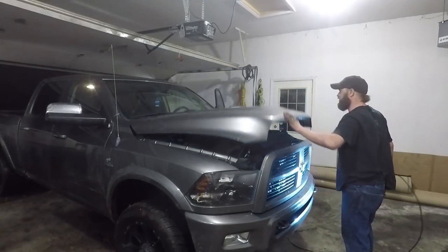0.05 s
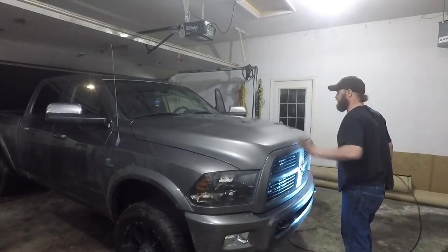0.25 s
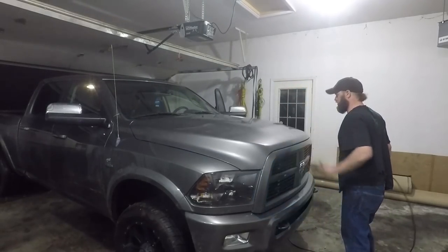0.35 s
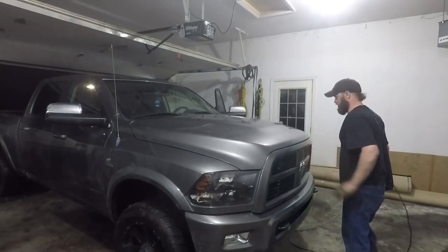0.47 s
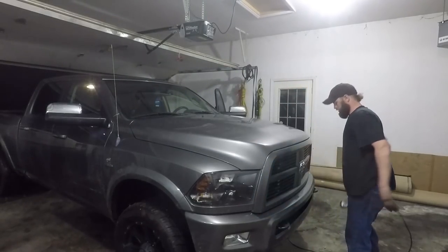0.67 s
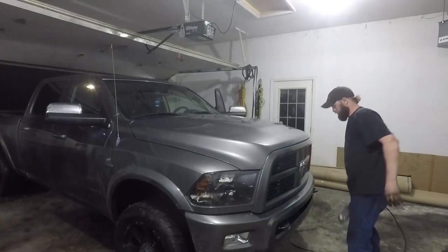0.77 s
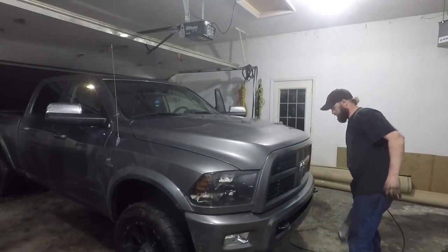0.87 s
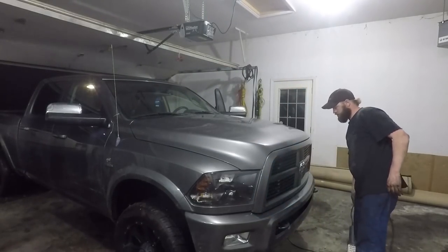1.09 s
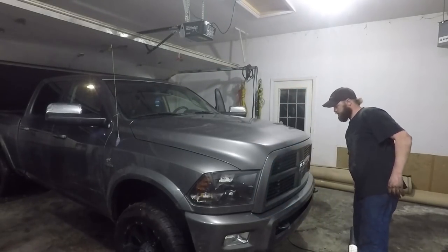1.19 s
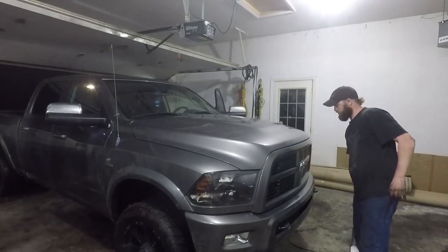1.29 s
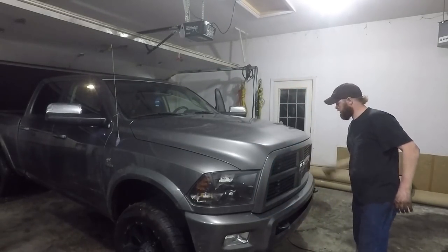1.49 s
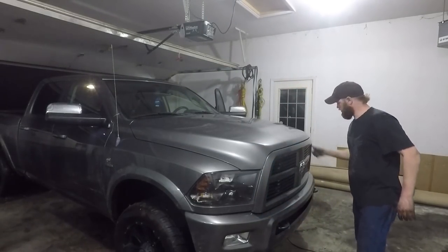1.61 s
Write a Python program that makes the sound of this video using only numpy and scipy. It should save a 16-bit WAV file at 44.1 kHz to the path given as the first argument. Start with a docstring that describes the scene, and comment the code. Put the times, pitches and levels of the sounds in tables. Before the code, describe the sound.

Truck hood slammed closed in a garage: sharp latch crack, deep boom, rattle, then faint knocks.

```python
"""Hood slam in a garage

A pickup's steel hood is slammed a few metres from a small camera: swelling panel modes, noise-burst
landings and chattering clicks. The latch cracks and rings; a lighter clank follows as the boom dies.
Later come soft scuffs, taps and a dull knock, over room tone, rumble and a faint whine.
Each hit is coloured noise plus garage reverberation; the camera's limiter holds the bang down."""
import sys
import numpy as np
from scipy import signal
from scipy.fft import rfft, irfft, next_fast_len
from scipy.io import wavfile
from scipy.ndimage import uniform_filter1d, minimum_filter1d

SR = 44100
rng = np.random.default_rng(int(sys.argv[2]) if len(sys.argv) > 2 else 0)


def file_out(sig):
    """Save sig as 16-bit WAV at sys.argv[1]."""
    # one column per channel
    cols = np.atleast_2d(sig).T
    # limit, then scale
    lim = np.clip(cols, -1, 1)
    pcm = np.round(lim * 32767).astype(np.int16)
    wavfile.write(sys.argv[1], SR, pcm)


N = 72765
SIZE = next_fast_len(N + N % 2, real=True)
T, HZ = np.arange(N) / SR, np.fft.rfftfreq(SIZE, 1 / SR)

# The two microphone ports. Each row: frequency in Hz, left minus right level in dB,
# likeness of the two from 0 to 1, left's phase lead in rad.
PORTS = [(40, 1, 0.45, -1.6), (100, 7, 0.77, 1), (199, 8, 0.94, -0.39), (370, 10.5, 0.99, -1.05),
         (717, 0.5, 0.89, -1.92), (1290, -6.5, 0.18, -1.91), (2140, -1, 0.26, -0.57),
         (3380, -2, 0.7, 0.037), (4870, 0, 0.3, -0.14), (6300, 6.5, 1, -1.8), (8600, -3, 0.56, -1.74),
         (14000, 0.5, 0, -0.51)]


def amp(db):
    """Decibels to gain."""
    return 10 ** (np.asarray(db) / 20)


def read(points, hz, axis=1):
    """One column of a table, interpolated on a log-frequency axis."""
    table = np.transpose(points)
    return np.interp(np.log(hz + 1), np.log(table[0] + 1), table[axis])


def add(mix, start_s, sound):
    """Mixes a sound in at a time, cut at the end of the mix."""
    part = mix[:, round(start_s * SR):][:, :sound.shape[1]]
    part += sound[:, :part.shape[1]]


def white():
    """Two independent white noises of 0 dB per Hz."""
    return rng.standard_normal((2, SIZE)) * np.sqrt(SR / 2)


def decay(t60_s, rise_s):
    """Exponential fall of 60 dB per t60, with an exponential rise."""
    rise = 1 - np.exp(-T / rise_s)
    return rise * np.exp(-np.log(1000) * T / t60_s)


def ports(hz):
    """Complex gain of the left and right port at a frequency, at constant summed power."""
    ratio = amp(read(PORTS, hz))
    right = np.exp(-1j * read(PORTS, hz, axis=3))
    return np.array([ratio + 0j, right]) * np.sqrt(2 / (1 + ratio ** 2))


def heard(drive, colour):
    """Colours a noise pair with a minimum-phase filter, correlates it and passes it to the ports."""
    log_gain = np.log(amp(read(colour, HZ)))
    # Folding the cepstrum makes the filter causal.
    cepstrum = irfft(log_gain, SIZE)
    cepstrum[1:SIZE // 2] *= 2
    cepstrum[SIZE // 2 + 1:] = 0
    colour_filter = np.exp(rfft(cepstrum))
    a, b = rfft(drive, SIZE)
    likeness = np.clip(read(PORTS, HZ, axis=2), 0, 1)
    pair = np.array([a, likeness * a + np.sqrt(1 - likeness ** 2) * b])
    return irfft(pair * ports(HZ) * colour_filter, SIZE)[:, :N]


def noise(colour):
    """Steady coloured noise at the two ports."""
    return heard(white(), colour)


def mode(hz, rise_s, t60_s):
    """One vibration mode: a sine that swells to full strength, then dies exponentially."""
    swell = np.sin(np.pi / 2 * np.minimum(T / rise_s, 1)) ** 2
    fall = np.exp(-np.log(1000) * np.maximum(T - rise_s, 0) / t60_s)
    return swell * fall * (ports(hz)[:, None] * np.exp(2j * np.pi * hz * T)).imag


def garage():
    """Dense reverberation: overlapping noise bands, each dying at its own speed."""
    # Each row: band centre in Hz, t60 in s.
    bands = [(60, 0.26), (200, 0.79), (450, 0.67), (1200, 0.72), (3000, .8), (4700, 0.77), (7000, 0.77),
             (13000, 0.29)]
    spectrum = rfft(white())
    centres_hz = [hz for hz, _ in bands]
    out = np.zeros((2, N))
    for weights, (_, t60_s) in zip(np.eye(len(bands)), bands):
        band_gain = read(list(zip(centres_hz, weights)), HZ)
        out += irfft(spectrum * band_gain, SIZE)[:, :N] * decay(t60_s, rise_s=.012)
    return out


def hit(colour, t60_s, rise_s, room_db):
    """An impact's crowded modes as a short noise burst, plus the room's answer."""
    burst = white()[:, :N] * decay(t60_s, rise_s)
    return heard(burst + amp(room_db) * garage(), colour)


def hood():
    """The hood lands and rocks on its stops: panel modes swell, truck and room boom, parts chatter."""
    # Panel modes. Each row: frequency in Hz, relative peak level in dB, swell time in s, t60 in s.
    panel_modes = [(57, -29, 0.1, 0.42), (75.2, -28, 0.11, 0.58), (105.1, -27, 0.14, 0.25),
                   (117.2, -19.5, 0.093, .45), (146.7, -12, 0.0403, 0.57), (170.8, -9.5, 0.019, 0.47),
                   (194.7, -9, 0.0726, 0.24), (218.1, -17.5, 0.21, 0.34), (223.84, -16.5, 0.14, 0.57),
                   (269.1, -14, 0.13, 0.48), (294.9, -14, 0.17, 0.2), (382.7, -12, 0.15, 0.2),
                   (387.6, -15.5, 0.017, .45), (440, -12.5, 0.071, 0.48), (553, -23, 0.057, 0.72),
                   (1020, -26, 0.045, .7)]
    # Landing, then rocking on the stops. Each row: start in s, relative level in dB.
    landings = [(.243, 2), (.315, -3.5), (.38, -11)]
    # Spectrum of one landing. Each row: frequency in Hz, relative density in dB per Hz.
    landing_colour = [(30, -78), (60, -46), (100, -53.5), (150, -36.5), (280, -34.5), (420, -37.5),
                      (500, -39.5), (1000, -43.5), (1500, -47), (2500, -58), (3500, -56.5), (6000, -64),
                      (9000, -74.5), (14000, -92)]
    # Spectrum of the loose parts. Each row: frequency in Hz, relative density in dB per Hz.
    rattle_colour = [(100, -78), (400, -33), (1000, -43.5), (2200, -50), (3500, -50), (6000, -62),
                     (9000, -55), (14000, -78)]
    clicks_per_s = 250

    out = np.zeros((2, N))
    panel = sum(amp(db) * mode(hz, rise_s, t60_s) for hz, db, rise_s, t60_s in panel_modes)
    add(out, .22, amp(-0.5) * panel)
    for start_s, db in landings:
        add(out, start_s, amp(db) * hit(landing_colour, t60_s=0.25, rise_s=0.011, room_db=0))

    clicks = (rng.random(N) < clicks_per_s / SR) * rng.uniform(0.4, 1, N)
    clicks = clicks * decay(t60_s=0.33, rise_s=.002)
    chatter = signal.fftconvolve(clicks, decay(t60_s=0.019, rise_s=1e-4))[:N]
    add(out, landings[0][0], heard(white()[:, :N] * chatter, rattle_colour))
    return out


def latch():
    """The striker snaps into the latch in sharp bursts and sets latch and steel mount ringing."""
    # Each row: start in s, relative level in dB.
    strikes = [(0.218, 1), (0.2336, -2), (.256, -2.5)]
    # Spectrum of one strike. Each row: frequency in Hz, relative density in dB per Hz.
    strike_colour = [(50, -97), (105, -65), (160, -46.5), (260, -51), (400, -45.5), (700, -51), (1400, -55),
                     (2100, -50), (2650, -56), (3400, -51), (4000, -53.5), (5200, -53), (5900, -45.5),
                     (7000, -52.5), (9000, -67.5), (13500, -78), (16000, -93)]
    # Latch and mount modes. Each row: frequency in Hz, level in dB, t60 in s.
    latch_modes = [(1240, -27.5, 0.86), (1780, -50, 0.93), (3365, -38, 0.51), (3575, -28.5, 0.81),
                   (4420, -29.5, 0.62), (5700, -48, 0.36), (5620, -38, 0.38)]

    out = np.zeros((2, N))
    for start_s, db in strikes:
        add(out, start_s, amp(db) * hit(strike_colour, t60_s=.13, rise_s=0.0005, room_db=-6.5))
    ringing = sum(amp(db) * mode(hz, 0.0034, t60_s) for hz, db, t60_s in latch_modes)
    add(out, strikes[0][0], ringing)
    return out


def clank():
    """A lighter metal impact: one fast-rising noise burst with its reverberation."""
    # Each row: frequency in Hz, density in dB per Hz.
    clank_colour = [(60, -80), (110, -64), (155, -51.5), (220, -66), (500, -66), (850, -51.5),
                    (1400, -51.5), (2200, -59.5), (3400, -64.5), (4150, -62.5), (4500, -55), (4900, -61),
                    (5200, -69.5), (6300, -65.5), (9000, -80), (14000, -99)]
    out = np.zeros((2, N))
    add(out, .5805, hit(clank_colour, t60_s=0.14, rise_s=0.00045, room_db=-5))
    return out


def knock():
    """A dull knock: a noise burst and the modes of the knocked object."""
    # Spectrum of the burst. Each row: frequency in Hz, relative density in dB per Hz.
    knock_colour = [(60, -67), (110, -66), (160, -52), (250, -68), (370, -50.5), (580, -52), (760, -51),
                    (880, -66.5), (1500, -75), (3500, -77), (9000, -98), (14000, -105)]
    # Modes of the knocked object. Each row: frequency in Hz, level in dB, t60 in s.
    knock_modes = [(161, -31, .24), (361, -34, 0.22), (455, -38, .25), (594.4, -27, 0.33), (723, -37, 0.24)]
    start_s = 1.527

    out = np.zeros((2, N))
    add(out, start_s, amp(0.5) * hit(knock_colour, t60_s=0.14, rise_s=0.0025, room_db=-6))
    ringing = sum(amp(db) * mode(hz, 0.011, t60_s) for hz, db, t60_s in knock_modes)
    add(out, start_s, ringing)
    return out


def scuffs():
    """Soft scuffs and taps on the floor: noise bursts, slow-rising or abrupt."""
    # Each row: start in s, relative level in dB, rise in s.
    contacts = [(1.111, -20.5, 0.0033), (1.446, -10.5, .02), (1.502, -8.5, 0.0027), (1.512, 0.5, 0.00053)]
    # Spectrum of one scuff. Each row: frequency in Hz, relative density in dB per Hz.
    scuff_colour = [(100, -76), (400, -74.5), (1200, -67.5), (2200, -71.5), (4300, -75.5), (6000, -72.5),
                    (9000, -85.5), (14000, -99)]
    out = np.zeros((2, N))
    for start_s, db, rise_s in contacts:
        add(out, start_s, amp(db) * hit(scuff_colour, t60_s=0.14, rise_s=rise_s, room_db=0))
    return out


def room_tone():
    """Coloured noise whose level dips after the bang and returns."""
    # Each row: frequency in Hz, relative density in dB per Hz.
    air_colour = [(30, -105), (100, -98.5), (135, -80), (170, -67), (230, -73), (400, -73), (700, -79),
                  (1400, -86), (2800, -93.5), (4500, -95), (6000, -95.5), (9000, -101), (13000, -109),
                  (16000, -116)]
    # Each row: time in s, relative level in dB.
    air_level = [(0, 0), (.2, 2), (.6, -14.5), (1, -3), (1.3, -1.5), (1.65, 4)]
    return noise(air_colour) * amp(np.interp(T, *np.transpose(air_level)))


def low_rumble():
    """Low-frequency noise that comes up with the bang and stays."""
    # Each row: frequency in Hz, relative density in dB per Hz.
    rumble_colour = [(15, -67.5), (32, -66), (55, -70), (90, -71), (140, -71.5), (300, -112.5)]
    # Each row: time in s, relative level in dB.
    rumble_level = [(0, -31), (.2, -38), (.3, 2), (1, -4.5), (1.3, 1.5), (1.65, 2)]
    return noise(rumble_colour) * amp(np.interp(T, *np.transpose(rumble_level)))


def electrical_whine():
    """A faint high sine, pulsed by a squared sine, equal at both ports."""
    whine_hz, pulses_per_s, peak_db = 8920, 30, -65.5
    pulses = np.sin(np.pi * pulses_per_s * T) ** 2
    return amp(peak_db) * np.sin(2 * np.pi * whine_hz * T) * pulses


def scene():
    """Everything heard at the camera."""
    slam = hood() + latch()
    later = clank() + knock() + scuffs()
    return slam + later + room_tone() + low_rumble() + electrical_whine()


def record(dry):
    """The camera's peak limiter with slow release, then a low-pass band limit."""
    ceiling, release_db_per_s, edge_hz = .96, 36.5, 15150
    over_db = np.maximum(20 * np.log10(abs(dry).max(0) / ceiling + 1e-9), 0)
    # Running maximum on a slope: instant attack, linear release in dB.
    release_db = release_db_per_s * T
    held_db = np.maximum.accumulate(over_db + release_db) - release_db
    # Centred windows bring the gain down smoothly just ahead of a peak.
    gain_db = uniform_filter1d(minimum_filter1d(-held_db, size=129), size=129)
    low_pass = signal.firwin(511, edge_hz, window=("kaiser", 9), fs=SR)
    return signal.oaconvolve(dry * amp(gain_db), low_pass[None], "same")


dry = scene()
out = record(dry)
file_out(out)
```